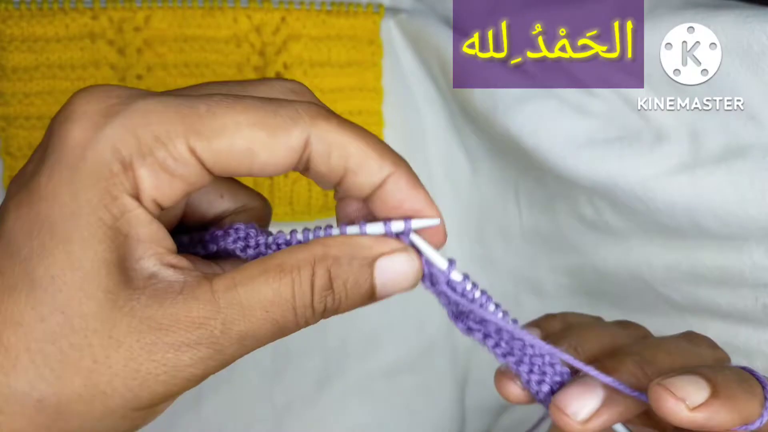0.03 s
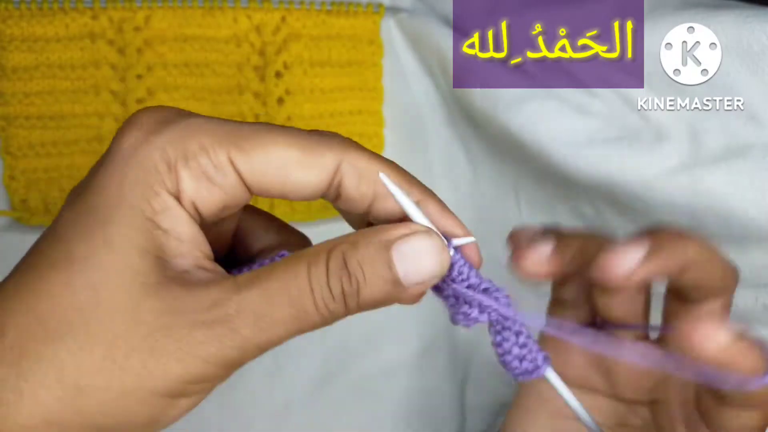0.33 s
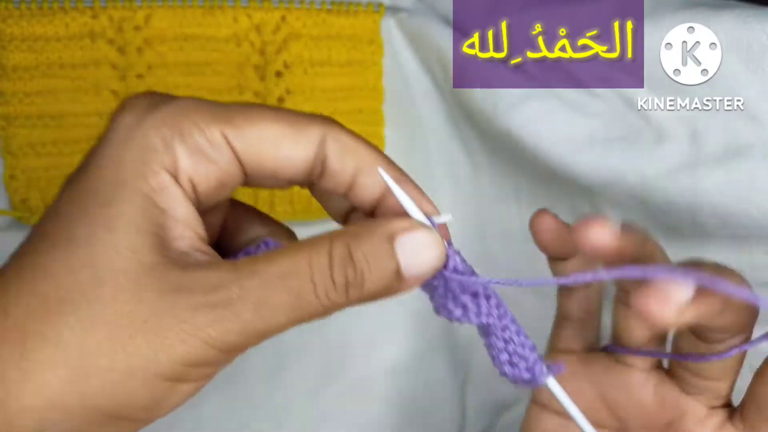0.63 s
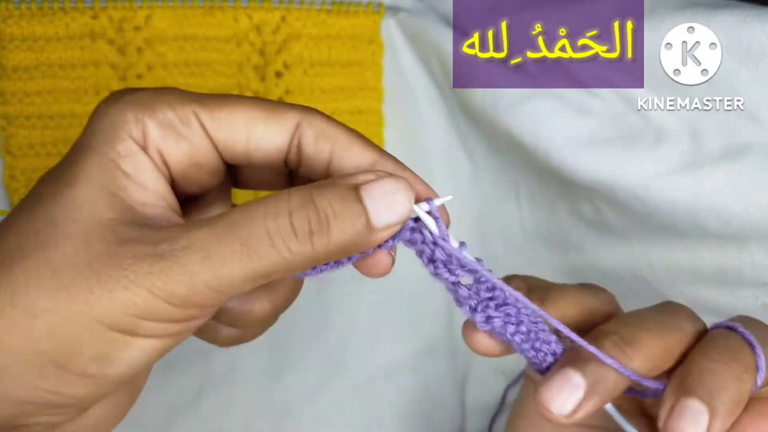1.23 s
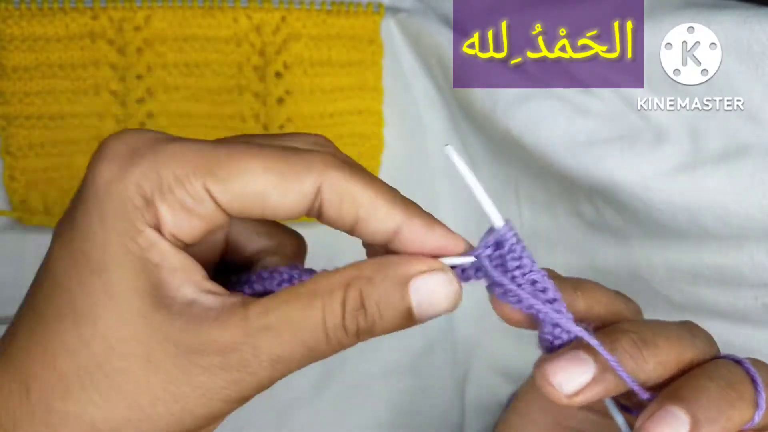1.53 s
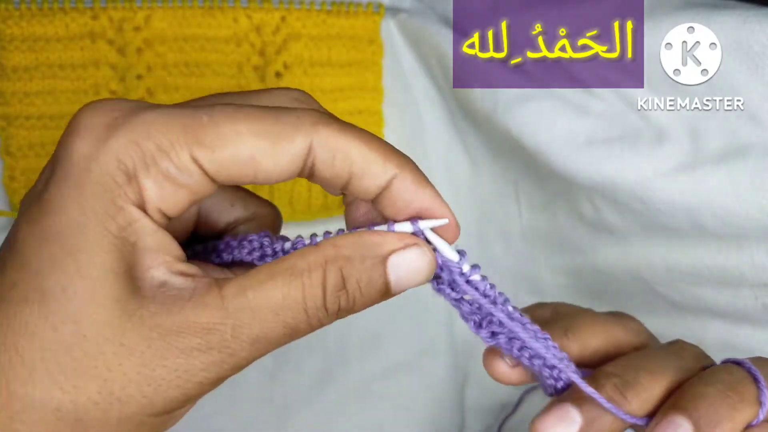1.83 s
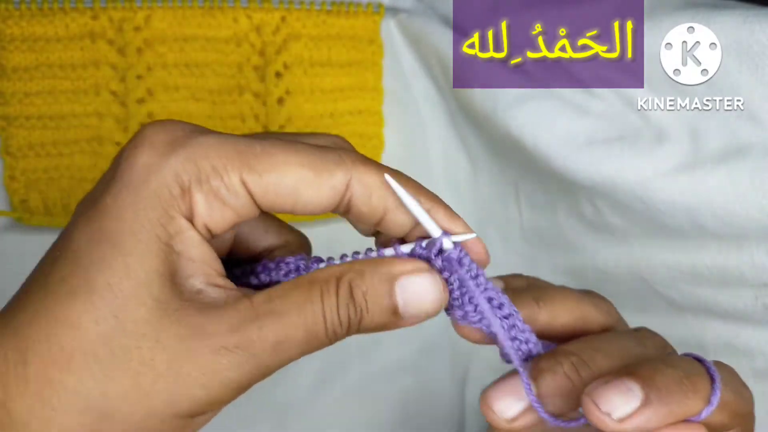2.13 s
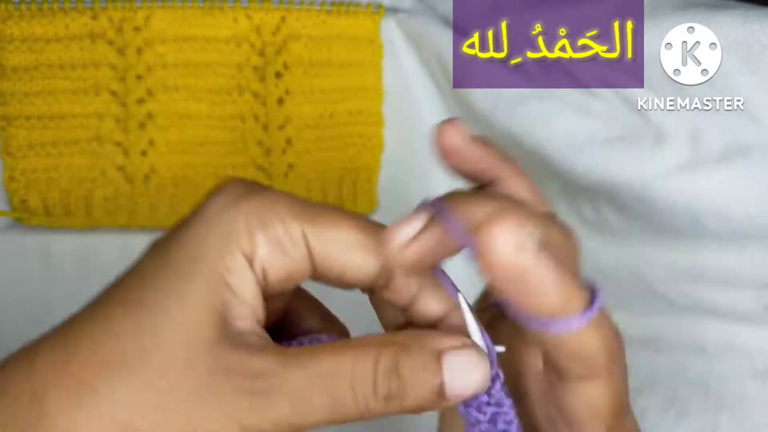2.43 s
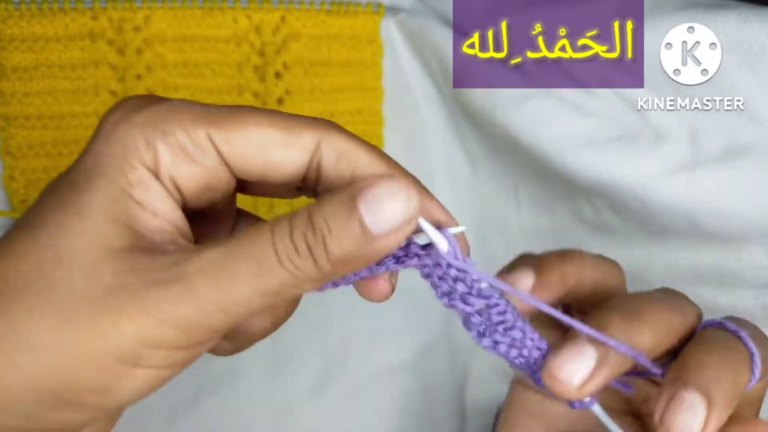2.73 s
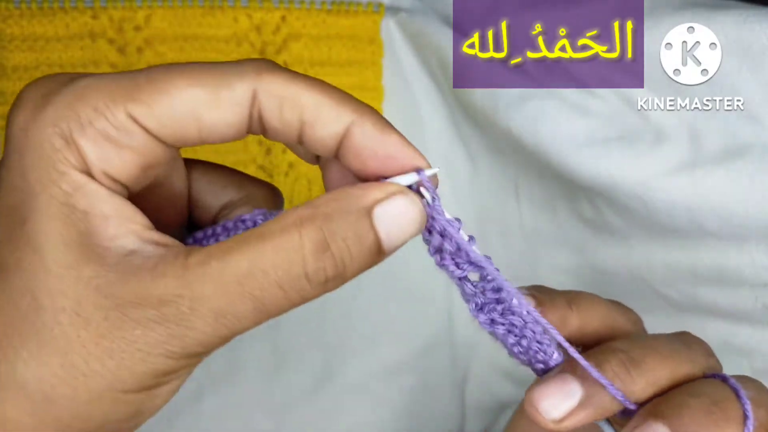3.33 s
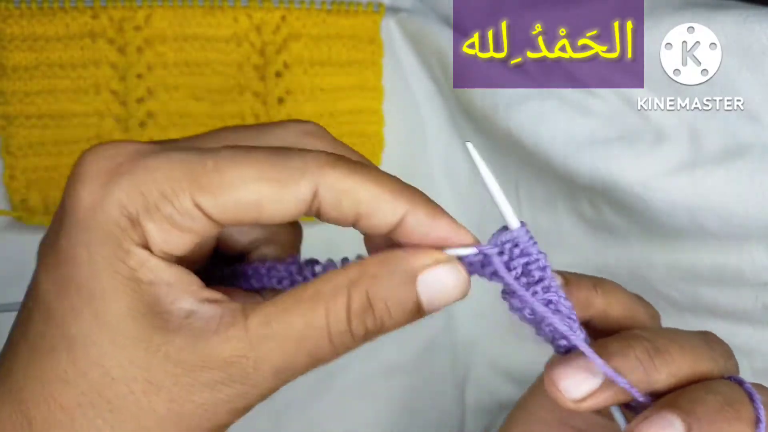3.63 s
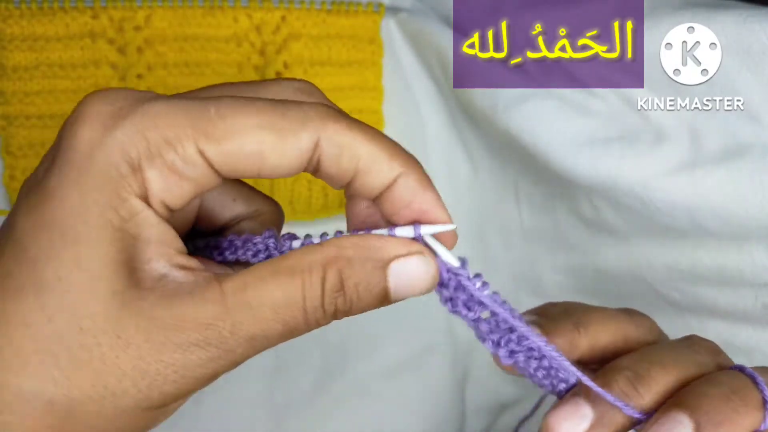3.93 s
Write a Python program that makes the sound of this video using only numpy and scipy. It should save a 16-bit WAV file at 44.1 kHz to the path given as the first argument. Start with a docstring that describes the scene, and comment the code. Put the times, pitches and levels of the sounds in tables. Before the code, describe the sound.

Knitting needles tick lightly and irregularly, close up. Yarn swishes over fingers at the start, then short, damped clicks come at about 1.1, 1.7, 2.8 and 3.5 seconds, the one at 1.7 loudest. Between them are dry scrapes through stitches, soft hand rubs and tiny squeaks. A fan hums low throughout in the quiet room, and from 3.4 seconds a very faint, distant whine rises and falls.

```python
"""Yarn slides over fingers, close up, against the hum and whirr of a fan in a quiet room: hand knitting.
Two thin needles tick together, their ringing soon damped by fingers and wool. Between ticks the tips
scrape through stitches and the hands rub the work, fibres catching and slipping in tiny grains.
Needle squeaks softly on needle, and near the end a faint, far whine rises and falls."""
import sys
import numpy as np
from scipy import signal
from scipy.fft import rfft, irfft, next_fast_len
from scipy.io import wavfile
from scipy.ndimage import map_coordinates

SR = 44100
rng = np.random.default_rng(int(sys.argv[2]) if len(sys.argv) > 2 else 0)


def to_wav(sig):
    """Store sig (one row per channel, or 1-D mono) as 16-bit WAV at the path in sys.argv[1].

    Samples outside -1..1 are clipped; the rate is SR.
    """
    pcm = np.clip(np.atleast_2d(sig), -1, 1) * 32767
    pcm = np.round(pcm).astype(np.int16)
    wavfile.write(sys.argv[1], SR, pcm.T)  # frames by channels


N = 176400


def amp(db):
    """Decibels to gain."""
    return 10 ** (np.asarray(db) / 20)


def unit(x):
    """x scaled to rms 1."""
    return x / np.sqrt(np.mean(x ** 2) + 1e-20)


def along(points, hz):
    """A curve through (Hz, value) points, read at hz on a log frequency axis."""
    f, v = np.transpose(points)
    return np.interp(np.log(hz + 1), np.log(f + 1), v)


def wobble(rate):
    """A smooth random curve with rate knots a second."""
    knots = rng.standard_normal(int(N * rate / SR) + 4)
    return map_coordinates(knots, [np.arange(N) * rate / SR])


def filtered(x, response):
    """x through an EQ whose gain is response(hz)."""
    size = next_fast_len(2 * len(x))
    return irfft(rfft(x, size) * response(np.fft.rfftfreq(size, 1 / SR)), size)[:len(x)]


def coloured(x, spectrum):
    """x shaped by an EQ curve of (Hz, dB) points, at rms 1."""
    return unit(filtered(x, lambda hz: amp(along(spectrum, hz))))


def friction(strokes, spectrum, rough_db, grains_per_s=900, grain_share=0.14):
    """Fibres catch and slip in tiny grains under strokes that swell and fade."""
    t = np.arange(N) / SR
    power = sum(amp(db) ** 2 * np.exp(-np.pi * ((t - s) / length) ** 2) for s, length, db in strokes)
    grains = unit((rng.random(N) < grains_per_s / SR) * rng.standard_normal(N))
    slip = np.sqrt(grain_share) * grains + np.sqrt(1 - grain_share) * rng.standard_normal(N)
    roughness = amp(rough_db * wobble(90))
    return np.sqrt(power) * roughness * coloured(slip, spectrum)


def noise_swells(rows, width):
    """Narrow bands of noise swell and fade; width is the half-width as a fraction of the pitch."""
    out, t = np.zeros(N), np.arange(N) / SR
    for s, length, db, hz in rows:
        band = filtered(rng.standard_normal(N), lambda f: 1 / (1 + ((f / hz - 1) / width) ** 2))
        out += amp(db) * np.exp(-np.pi / 2 * ((t - s) / length) ** 2) * unit(band)
    return out


def yarn_pulls():
    """Yarn drawn over the fingers gives a soft, grainy swish."""
    # Each row: middle in seconds, length in seconds, level in dB.
    pulls = [(.01, 0.08, -61), (.16, 0.29, -65), (.32, .12, -78), (.52, 0.11, -65.5), (.6, 0.081, -65.5),
             (1.2, 0.018, -63), (1.42, 0.089, -67), (2.44, 0.14, -69.5), (3.8, 0.34, -73.5)]
    # Each row: frequency in Hz, relative noise density in dB.
    spectrum = [(200, -9.5), (600, 8.5), (1200, -1.5), (2400, 5.5), (4000, -3), (6000, -10), (8500, -6),
                (12000, -10), (15500, -12)]
    return friction(pulls, spectrum, rough_db=1.5)


def room_tone(air_db=-61, rumble_db=-57):
    """A steady bed of room air and microphone hiss over a low rumble."""
    # Each row of both: frequency in Hz, relative noise density in dB.
    air_spectrum = [(110, 9.5), (150, 6.5), (220, 1), (350, 1.5), (450, -2.5), (580, -1), (750, -2.5),
                    (1100, -4), (1620, -6), (1750, -4), (1900, -8.5), (2150, -5), (2520, -6), (3200, -12),
                    (4200, -16), (6000, -19.5), (8300, -16), (10000, -18), (13500, -16), (15200, -10),
                    (16000, -19.5)]
    rumble_spectrum = [(5, 1), (18, 0), (31, -6.5), (40, 0.5), (50, -14), (62, -6.5), (80, -8.5),
                       (110, -14.5), (150, -46), (300, -60)]
    air = amp(air_db) * coloured(rng.standard_normal(N), air_spectrum)
    rumble = amp(rumble_db) * coloured(rng.standard_normal(N), rumble_spectrum)
    return air + rumble


def fan_hum(waver_db=1, pitch_drift=0.00321):
    """A fan hums low with weak higher tones, each a little unsteady in level and pitch."""
    # Each row: frequency in Hz, level in dB before swell and waver.
    tones = [(31, -58), (92.3, -50.5), (184.5, -71), (276.8, -81), (323, -82.5), (360, -79.5),
             (484.7, -79.5), (554, -79), (571, -83.5), (646.3, -81), (1739, -83.5)]
    # The slow swell of the whole hum. Each row: time in seconds, gain in dB.
    swell = [(0, -1.1), (1.4, 0.6), (2.6, -1), (3.3, 0.6), (4, 1.5)]
    swell_db = np.interp(np.arange(N) / SR, *np.transpose(swell))
    out = np.zeros(N)
    for hz, db in tones:
        level = amp(db + swell_db + waver_db * wobble(3.77))
        drifting_hz = hz * (1 + pitch_drift * wobble(7))
        phase = 2 * np.pi * (np.cumsum(drifting_hz) / SR + rng.random())
        out += level * np.sqrt(2) * np.sin(phase)
    return out


def room_whirr():
    """A midrange whirr comes up briefly in the room now and then."""
    # Each row: middle in seconds, length in seconds, level in dB, pitch in Hz.
    whirrs = [(.03, .07, -67, 573), (.3, 0.071, -69, 645), (1.32, .1, -70, 605), (2.04, 0.092, -66.5, 570),
              (2.92, 0.071, -71, 640)]
    return noise_swells(whirrs, width=0.044)


def needle_ticks(crack_db=-9, crack_t60_s=0.0021, boost_width_hz=370, level_window_s=.005):
    """The needles touch for a millisecond or so; the grip retunes their bending modes and damps them."""
    # Each row: start in seconds, level in dB over the level window, contact time in seconds, pitch
    # ratio of the bending modes under the grip, a gain in dB for each of the four bands below,
    # and the (Hz, dB) boosts of the modes that the contact point favours.
    ticks = [(.1915, -58, .0003, 1, -4, -2, 0, 0, []), (.219, -56, .0003, 1, -4, 2, -4, 2, []),
             (1.1291, -43, 0.00095, 1.048, 4, 2, -7, -3.5, [(3550, 3), (5100, 5), (8350, 18), (12350, 11)]),
             (1.6819, -27.5, 0.0012, 1, -1.5, -2.5, 4.5, 0, [(3450, -2), (4880, 4.5), (6670, 4.5),
             (11200, -1), (13160, -1)]), (1.9493, -51.5, 0.00039, 1.1, -1, 4.5, -5, 1, [(7900, 7)]),
             (2.0248, -53.5, .0003, 1, -6, -2, -3, -3, [(12300, 5)]),
             (2.7988, -43, 0.00062, 1.03, 2, 4.5, -7, -2, [(5150, 7), (7500, 9), (9500, 13.5),
             (12650, 21)]), (3.2218, -52.5, .0003, 0.78, 3, 3, -5, -3, [(8800, 3)]),
             (3.237, -58, .0003, 0.85, 11, 1, -4, 0, [(8800, 2)]),
             (3.4625, -38.5, 0.00067, 1.08, 4.5, -1, -9, -1.5, [(3500, 5), (11900, 19), (14400, 7.5)]),
             (3.85, -51, .0003, 0.86, 6, -2.5, -12, 0, [])]
    # A needle's modes. Each row: frequency in Hz, relative level in dB, time to fall 60 dB in seconds.
    modes = [(2320, -26, 0.015), (3320, -24.5, 0.0062), (4900, -23.5, 0.0088), (6640, -12.5, 0.0037),
             (7550, -17, 0.007), (8130, -11.5, 0.0035), (8950, -15.5, 0.015), (9680, -14.5, 0.0058),
             (10540, -7.5, 0.0033), (11390, -2.5, 0.0071), (12000, -12, 0.0052), (13020, -0.5, 0.0077),
             (13700, -1, 0.0064), (14430, -1, 0.0037), (15600, 2, .006)]
    # The crack of the contact. Each row: frequency in Hz, relative level in dB.
    crack_spectrum = [(500, -15), (2000, -20), (4200, -10.5), (5800, -11), (9000, -11), (14000, 3),
                      (16500, -1)]
    bending_hz = (2000, 5400)
    bands_hz = bending_hz, (6500, 9600), (11000, 13100), (14200, 16000)
    free_hz, mode_db, t60 = np.transpose(modes)[:, :, None]
    out, t = np.zeros(N + SR), np.arange(SR // 25) / SR
    for start, db, contact_s, grip, *band_db, boosts in ticks:
        hz = np.where(free_hz < bending_hz[1], grip * free_hz, free_hz)
        touch_eq = [(edge, gain) for band, gain in zip(bands_hz, band_db) for edge in band]
        boost_db = sum(gain * np.exp(-((hz - f) / boost_width_hz) ** 2) for f, gain in boosts)
        drive_db = mode_db + along(touch_eq, hz) + boost_db
        attack = 1 - np.exp(-2 * t / contact_s)
        since_release = np.maximum(t - contact_s, 0)
        partials = np.sin(2 * np.pi * (hz * t + rng.random(hz.shape)))
        ring = (amp(drive_db - 60 * since_release / t60) * partials).sum(axis=0)
        noise = coloured(rng.standard_normal(len(t)), crack_spectrum)
        crack = coloured(noise, touch_eq) * amp(-60 * since_release / crack_t60_s)
        tick = unit(unit(attack * ring) + amp(crack_db) * unit(attack * crack))
        out[round(start * SR):][:len(t)] += amp(db) * tick * np.sqrt(level_window_s * SR / len(t))
    return out[:N]


def tip_scrapes():
    """The needle tips push through stitches with a bright, dry rasp."""
    # Each row: middle in seconds, length in seconds, level in dB.
    scrapes = [(.195, 0.047, -63), (.222, 0.03, -61), (.255, 0.055, -68), (.327, 0.036, -65),
               (.41, 0.053, -68.5), (.93, 0.011, -68), (1.08, 0.022, -66), (1.19, 0.27, -69),
               (1.575, 0.058, -67), (1.705, 0.03, -59), (1.925, 0.062, -68), (2.04, 0.069, -70.5),
               (2.12, 0.039, -58), (2.205, 0.048, -62), (2.26, 0.061, -68), (2.46, 0.064, -67.5),
               (2.54, 0.021, -66), (2.73, 0.05, -67), (2.965, 0.044, -66.5), (3.03, .05, -71),
               (3.085, .05, -67), (3.19, .08, -70), (3.275, 0.11, -72), (3.53, 0.12, -70.5),
               (3.68, 0.065, -68.5), (3.77, 0.044, -67.5), (3.975, 0.05, -72)]
    # Each row: frequency in Hz, relative noise density in dB.
    spectrum = [(1000, -26), (3000, -6.5), (5500, -7.5), (7000, -5), (8300, -3.5), (10200, -4),
                (12000, -0.5), (13100, 4), (13900, -1), (15100, 8), (16000, -6.5)]
    return friction(scrapes, spectrum, rough_db=2.15)


def hand_rubs():
    """The hands rub on the work, soft and dull."""
    # Each row: middle in seconds, length in seconds, level in dB.
    rubs = [(.25, 0.17, -69), (.45, 0.05, -63), (.96, 0.12, -66.5), (2.24, 0.16, -63.5), (2.55, 0.13, -75)]
    # Each row: frequency in Hz, relative noise density in dB.
    spectrum = [(60, 0.5), (180, 1.5), (380, 0.5), (600, -12), (1200, -19), (4000, -42)]
    return friction(rubs, spectrum, rough_db=-2.0)


def needle_squeaks():
    """Needle slides on needle with a brief, thin squeak."""
    # Each row: middle in seconds, length in seconds, level in dB, pitch in Hz.
    squeaks = [(1.17, 0.11, -78, 8100), (1.726, 0.072, -71.5, 8600), (1.922, .04, -70, 8100),
               (2.115, 0.021, -69, 6840), (3.083, 0.024, -70, 8900)]
    return noise_swells(squeaks, width=.07)


def far_whine(fuzz=0.69):
    """A faint tone rises and sinks, blurred by a fast flutter of level and phase."""
    # Each row: time in seconds, pitch in Hz, level in dB.
    glide = [(3.35, 1124, -93), (3.463, 1207, -70.5), (3.532, 1302, -76), (3.61, 1376, -69),
             (3.74, 1374, -69), (3.82, 1310, -72), (4, 1236, -77)]
    s, hz, db = np.transpose(glide)
    t = np.arange(N) / SR
    flutter = 1 + fuzz * (wobble(110) + 1j * wobble(110))
    phase = 2 * np.pi * np.cumsum(np.interp(t, s, hz)) / SR
    tone = unit(np.real(flutter * np.exp(1j * phase)))
    return np.interp(t, s, amp(db), left=0) * tone


def room_reverb(x):
    """The short, faint tail of a furnished room; cloth swallows the highest treble."""
    # Each row: frequency in Hz, time to fall 60 dB in seconds.
    decay = [(300, 0.23), (3000, 0.075), (9000, 0.16), (15000, 0.073)]
    # Each row: frequency in Hz, gain of the reverb in dB.
    return_eq = [(300, -17), (8500, -17), (11000, -25), (13000, -28), (16000, -26)]
    hz, t, noise = signal.stft(rng.standard_normal(SR // 2), SR, nperseg=256)
    tail = signal.istft(noise * amp(-60 * t / along(decay, hz)[:, None]), SR, nperseg=256)[1]
    wet = signal.fftconvolve(x, tail / np.linalg.norm(tail))[:N]
    return filtered(wet, lambda f: amp(along(return_eq, f)))


def scene():
    """The knitting up close, the room behind it, in mono."""
    knitting = yarn_pulls() + hand_rubs() + needle_ticks() + tip_scrapes() + needle_squeaks()
    mix = knitting + room_reverb(knitting) + room_tone() + fan_hum() + far_whine() + room_whirr()
    return mix[None]


def record(dry, cutoff_hz=15450):
    """A steep low-pass takes off the very top of the treble."""
    return signal.sosfilt(signal.ellip(10, .1, 70, cutoff_hz, fs=SR, output="sos"), dry)


dry = scene()
out = record(dry)
to_wav(out)
```